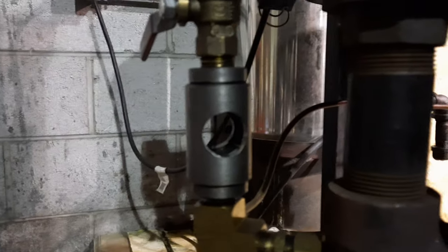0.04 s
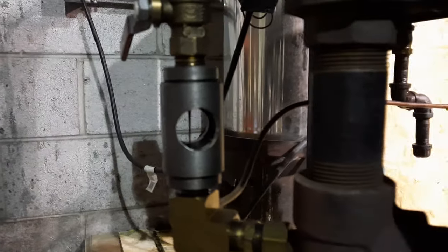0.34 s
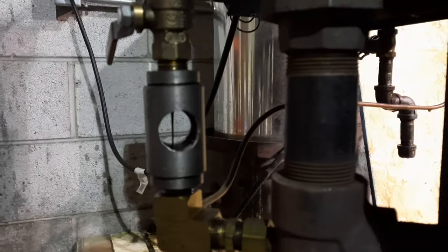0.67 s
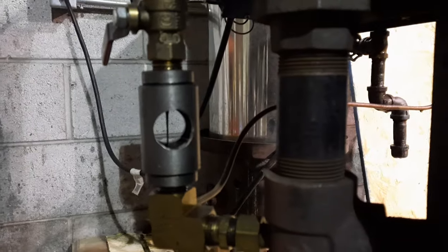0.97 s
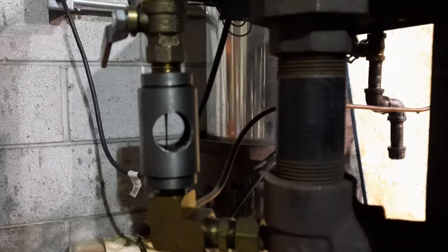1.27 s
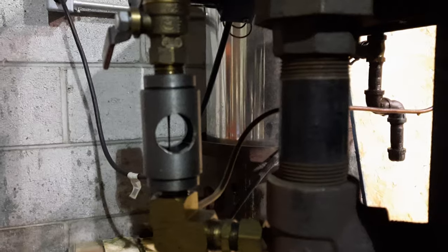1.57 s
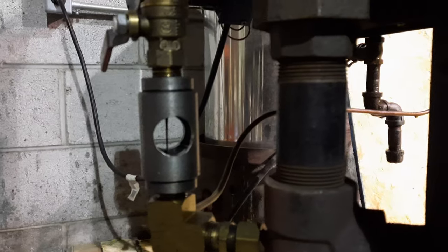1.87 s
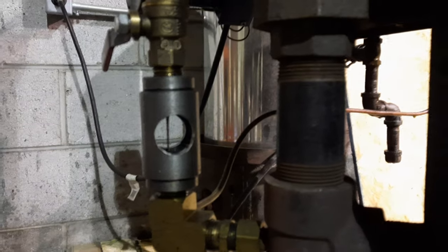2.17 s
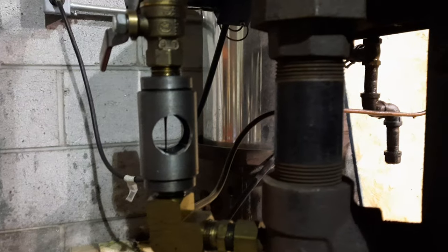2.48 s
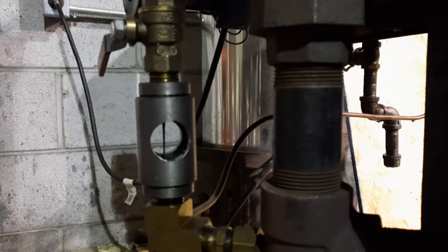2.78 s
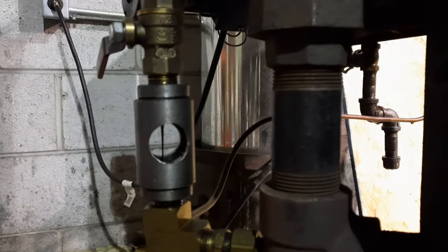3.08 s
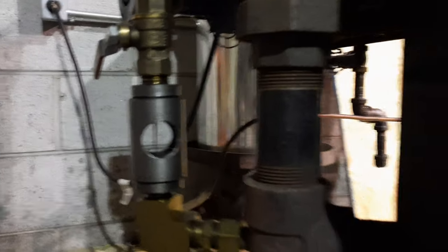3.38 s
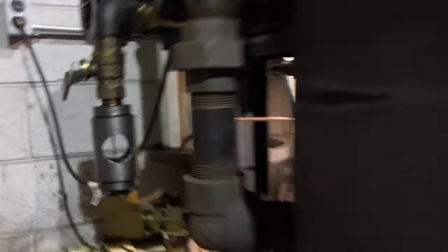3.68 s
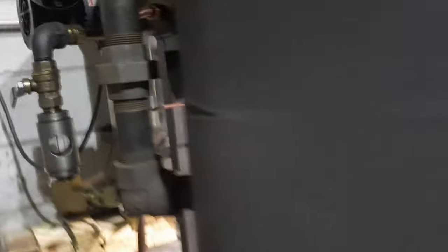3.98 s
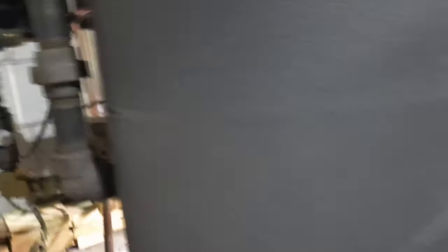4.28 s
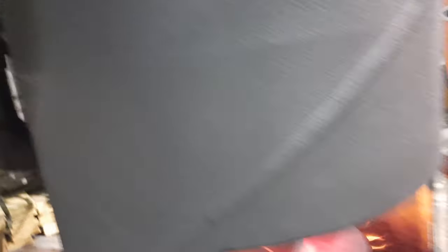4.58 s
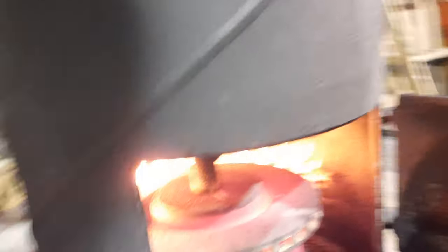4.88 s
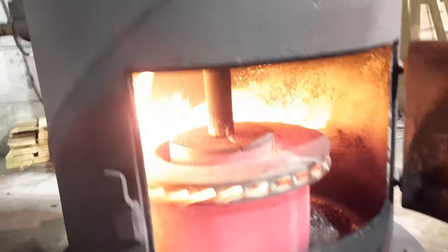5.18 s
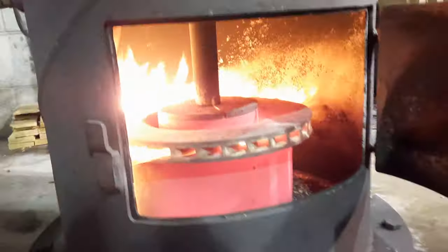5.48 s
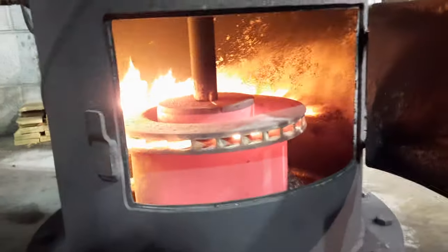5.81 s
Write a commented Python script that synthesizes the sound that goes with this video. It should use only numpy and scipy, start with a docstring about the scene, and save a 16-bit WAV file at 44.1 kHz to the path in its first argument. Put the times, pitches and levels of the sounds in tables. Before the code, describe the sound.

Low, throbbing roar of a forced-air stove in a workshop, with a fan whine, faint handling ticks and, later, oil sizzling.

```python
"""A home-made oil stove burns with forced air in a workshop. Its turbulent flame makes the flue rumble,
the drum throb and hum, and the burner chamber roar. We listen from a hand-held camera that starts behind
the stove, near the whining blower, and moves round to the open fire door, where the oil sizzles and a low
note sings. Fingers tick and brush lightly on the camera, and small metal parts tink."""
import sys
import numpy as np
from scipy.fft import rfft, irfft, next_fast_len
from scipy.io import wavfile
from scipy.ndimage import uniform_filter1d, map_coordinates

SR = 44100
rng = np.random.default_rng(int(sys.argv[2]) if len(sys.argv) > 2 else 0)


def master(y):
    """Save y as 16-bit WAV."""
    cut = np.clip(np.atleast_2d(y).T, -1, 1)
    pcm = np.round(cut * 32767)  # scale
    wavfile.write(sys.argv[1], SR, pcm.astype(np.int16))


N = 257984
TIME = np.arange(N) / SR


def amp(db):
    """Turn decibels into a gain."""
    return 10 ** (np.asarray(db) / 20)

def unit(x):
    """Scale x to an average (rms) level of 1."""
    return x / np.sqrt(np.mean(x ** 2) + 1e-20)

def along(points, hz):
    """Read between rows of (Hz, value) on a log frequency scale."""
    freqs, values = np.transpose(points)
    return np.interp(np.log(hz + 1), np.log(freqs + 1), values)

def curves(rows):
    """Join rows of (seconds, values) into one curve for each value column."""
    times, *columns = np.transpose(rows)
    return [np.interp(TIME, times, column) for column in columns]

def wobble(rate):
    """A smooth curve through rate random points a second."""
    return map_coordinates(rng.standard_normal(int(N * rate / SR) + 4), [TIME * rate])

def swell(middle, half):
    """A smooth rise and fall, 1 at its middle."""
    return np.exp(-((TIME - middle) / half) ** 2)

def filtered(x, response):
    """Give each frequency in x the gain response(hz)."""
    size = next_fast_len(N + 8192, True)
    return irfft(rfft(x, size) * response(np.fft.rfftfreq(size, 1 / SR)), size)[..., :N]

def tilted(x, db_per_octave):
    """Make x brighter or duller, at level 1."""
    octaves = np.log2(np.fft.rfftfreq(x.shape[1]) + 1e-4)
    return unit(irfft(rfft(x) * amp(db_per_octave * octaves), x.shape[1]))

def even(x, span):
    """Even out swells slower than span seconds."""
    size = max(int(span * SR), 1)
    power = uniform_filter1d(uniform_filter1d(np.mean(x ** 2, 0), size), size)
    return unit(x / np.sqrt(np.abs(power) + 1e-6))

# How alike left and right are. Each row: frequency in Hz, likeness (1 means the same).
LIKENESS = [(60, 1), (160, 0.98), (300, 0.75), (450, 1), (700, 0.69), (1300, 0.58), (2500, 0.32),
            (5000, 0.063), (12000, 0.073)]
def turbulence():
    """White stereo noise, alike in the bass and unrelated in the treble."""
    def mid_and_side(hz):
        angle = np.arccos(np.clip(along(LIKENESS, hz), -.995, .995)) / 2
        return np.array([np.cos(angle), np.sin(angle)])
    mid, side = filtered(rng.standard_normal((2, N)), mid_and_side)
    return np.array([mid + side, mid - side])

def rush(spectrum):
    """Turbulence with a broad tone colour, at level 1."""
    return unit(filtered(turbulence(), lambda hz: amp(along(spectrum, hz))))

def resonate(modes, door):
    """Turbulence rings in resonances, heard from behind (door = 0) round to the fire door (door = 1)."""
    def response(hz):
        centre, width, *levels = np.transpose(modes)
        detune = (hz - centre[:, None] ** 2 / (hz + 1)) / width[:, None]
        shape = 1 / (1 + detune ** 2 / 3)
        return np.sqrt(amp(levels) ** 2 @ shape ** 3)[:, None]
    behind, beside, front = filtered(turbulence(), response)
    back, forth = np.clip(1 - 2 * door, 0, 1), np.clip(2 * door - 1, 0, 1)
    return unit(back * behind + (1 - back - forth) * beside + forth * front)

# Resonances of the flue, the drum and the burner chamber. Each row: pitch in Hz, width in Hz,
# then relative level in dB behind the stove, beside it and at the door.
FLUE_MODES = [(64.4, 15.4, -5.5, -2.5, -10), (90, 15, -16, -15.5, -9.5)]
DRUM_MODES = [(111.7, 11.6, -5, -7, -2), (136.2, 21, -3, -4, -2), (159.7, 21, -6.5, 0, -0.5),
              (183.6, 14.2, -3.5, -8.5, -16), (216, 75, -22.5, -20.5, -11.5)]
CHAMBER_MODES = [(285, 23.6, -5, -2.5, -6.5), (318, 16, -3.5, -1, -2.5), (344.5, 44, -5, -4.5, 2.5),
                 (388.6, 17.4, 1.5, -2, 2.5), (431.2, 27.4, -1.5, -4, -15.5), (476.4, 34.8, -8, -12, -2)]
# The draught drifts slowly. Each row: time in seconds, rumble level in dB, roar level in dB.
DRAUGHT_LEVELS = [(0, -33, -26), (.8, -33.5, -25.5), (1.6, -32.5, -28), (2.3, -29, -25), (2.9, -35.5, -26),
                  (3.7, -29, -25.5), (4.8, -32.5, -25.5), (5.1, -29.5, -24.5), (5.85, -32, -28)]
# The flame surges or sags. Each row: middle in seconds, half length in seconds,
# change of the hum in dB (the throb takes a share of it), change of the rumble in dB.
FLAME_SURGES = [(0.586, 0.069, 2.5, 2), (0.849, 0.15, 4.5, 4), (1.004, 0.045, -7.5, -3),
                (1.758, 0.056, 5.5, -7.5), (2.56, 0.035, 4.5, 5.5), (3.405, .07, 2, 5.5),
                (0.13, 0.028, 2.5, 11), (4.172, 0.04, 8, 1.5), (4.32, 0.09, 1.5, -1),
                (5.227, 0.04, -4.5, 7), (5.414, 0.022, 7, 2.5), (5.59, 0.039, 7.5, 1)]
PUFF_S = .11  # puffs shorter than this flutter freely
def fire(door, throb_db=-21, surge_share=.6):
    """The flame rumbles in the flue, throbs in the drum and roars in the burner chamber."""
    rumble_db, roar_db = curves(DRAUGHT_LEVELS)
    rumble_db += sum(db * swell(s, half) for s, half, _, db in FLAME_SURGES)
    surge_db = sum(db * swell(s, half) for s, half, db, _ in FLAME_SURGES)
    rumble = amp(rumble_db) * even(resonate(FLUE_MODES, door), span=.16)
    throb = amp(throb_db + surge_share * surge_db) * even(resonate(DRUM_MODES, door), span=PUFF_S)
    roar = amp(roar_db) * even(resonate(CHAMBER_MODES, door), span=.75)
    return rumble + throb + roar

def drum_hum(door, hz=159.5, level_db=-25.2, wander_rad=.9, waver_db=1.45, front_db=1.0):
    """The flame locks on to the drum's main resonance: a wavering hum that follows the surges."""
    phase = 2 * np.pi * hz * TIME + wander_rad * wobble(12)
    surge_db = sum(db * swell(s, half) for s, half, db, _ in FLAME_SURGES)
    waver = unit(amp(waver_db * wobble(16)))
    return np.sqrt(2) * amp(level_db + surge_db + front_db * door) * waver * np.sin(phase)

# Resonances of the pipework. Each row reads like a row of FLUE_MODES.
PIPE_MODES = [(601, 91, -4, -5.5, -22.5), (692, 54, -8, -6, -15), (789, 65, -4.5, -12, -5.5),
              (859, 60, 0, -7.5, -6), (949, 80, -4, -10.5, -9), (1134, 37, -6.5, -15.5, -8.5),
              (1505, 120, -18.5, -11, -13), (1645, 87, -6.5, -8.5, -10.5), (2050, 69, -10.5, -22, -33),
              (3110, 140, -20, -29.5, -28.5)]
# The colour of rushing air. Each row: frequency in Hz, relative level in dB.
AIR_COLOUR = [(30, -8), (200, -13), (700, -4), (1100, -6), (1900, -4.5), (2300, -9), (2700, -13.5),
              (3500, -18), (5700, -20.5), (6600, -25), (8400, -26), (9200, -34), (12500, -33.5),
              (15700, -35.5)]
def forced_air(door, pipes_db=-41, air_db=-43, shadow_db=-11, pipes_shadow_db=-1.5, flutter_db=1.0):
    """Air rushes through the pipework; the drum shades its hiss from the front."""
    flutter = amp(flutter_db * wobble(15))
    pipes = amp(pipes_db + pipes_shadow_db * door ** 2) * resonate(PIPE_MODES, door)
    hiss = amp(air_db + shadow_db * door) * rush(AIR_COLOUR)
    return flutter * pipes + hiss

# The fan's tones. Each row: pitch in Hz, level in dB before shading, phase wander in radians.
FAN_TONES = [(394, -40, 0.37), (621.4, -50.5, 0.53), (849, -58, 0.74), (1100, -65, 1.7), (1282, -49.5, 1),
             (3200, -67, 1.8), (4020, -73, 1.3)]
def blower(door, shadow_db=-17, buzz_hz=119.98, buzz_peak=45, buzz_db=-66.5, fall_db=6.5):
    """The fan whines and the motor buzzes thinly; both fade as the drum gets in the way."""
    # The buzz lies on multiples of twice the mains frequency, strongest at multiple buzz_peak.
    buzz = [((buzz_peak + k) * buzz_hz, buzz_db - fall_db * np.log2(1 + abs(k)), .4)
            for k in range(-4, 5)]
    whine = np.zeros((2, N))
    for hz, db, wander in list(FAN_TONES) + buzz:
        stereo_phase = np.arccos(np.clip(along(LIKENESS, hz), -1, 1)) * np.array([[.5], [-.5]])
        gain = np.sqrt(2) * amp(db + 1.5 * wobble(8))
        whine += gain * np.sin(2 * np.pi * hz * TIME + wander * wobble(12) + stereo_phase)
    return whine * amp(shadow_db * door)

# Narrow notes of the hot chamber and burner ring. Each row: pitch in Hz, width in Hz,
# level in dB where loudest, that place on the way round (0 to 1), spread to each side of it.
BEAMED_NOTES = [(387.3, 14, -26, 0.23, 0.092), (351.3, 15, -27.5, 0.42, 0.17), (880, 32, -46, .89, 0.16),
                (1611, 18, -46.5, 0.75, 0.16), (1666, 32, -53.5, .68, 0.16)]
def stove_notes(door):
    """Each resonance beams its note one way, and the camera passes through one beam after another."""
    out, flow = np.zeros((2, N)), turbulence()
    for centre, width, db, facing, spread in BEAMED_NOTES:
        ring = filtered(flow, lambda hz: 1 / (1 + ((hz - centre) / width) ** 2))
        beam = np.exp(-((door - facing) / spread) ** 2)
        out += amp(db) * beam * even(ring, span=PUFF_S)
    return out

# Faint hand movements. Each row: start in seconds, level in dB, length in seconds,
# band centre in Hz, band width in octaves.
HAND_RUSTLES = [(.005, -46.5, 0.16, 2000, 0.59), (0.368, -47.5, 0.038, 2400, 0.82),
                (3.62, -54.5, 0.14, 4640, 0.47), (4.215, -46, 0.15, 1850, 0.61)]
def rustles():
    """Each small move of the hand is a soft swell of noise in one band."""
    out = np.zeros((2, N))
    for start, db, length, centre, octaves in HAND_RUSTLES:
        noise = rng.standard_normal((2, N))
        band = filtered(noise, lambda hz: np.exp(-np.log2((hz + 1) / centre) ** 2 / octaves ** 2))
        age = 2 * np.maximum(TIME - start, 0) / length
        out += amp(db) * age * np.exp(1 - age) * unit(band)
    return out

# The colour of skin rubbing the case. Each row: frequency in Hz, relative level in dB.
SKIN_COLOUR = [(500, -33), (3000, 2), (6000, 2.5), (8500, -2), (9800, -8.5), (12500, -1), (15700, -13)]
# The palm slides. Each row: middle in seconds, half length in seconds, level in dB.
PALM_STROKES = [(.05, 0.33, -64), (2.531, .13, -62.5), (3.951, 0.27, -61), (5.071, 0.22, -60)]
# Fingers touch. Each row: start in seconds, level in dB, length in seconds, brightness in dB per octave.
FINGER_TOUCHES = [(0.261, -60, 0.0037, 0.5), (0.709, -50.5, 0.013, -3.5), (1.57, -61.5, 0.012, 2),
                  (3.903, -45, 0.006, -2), (3.95, -53.5, 0.018, 8.5), (4.263, -49, 0.022, -2),
                  (4.366, -47.5, 0.008, -0.5), (4.41, -43, 0.0056, 1.5), (4.477, -46.5, 0.0054, 0.5),
                  (4.735, -48.5, 0.04, 5.5), (5.043, -43.5, 0.0015, 6), (5.09, -56.5, 0.029, 9.5),
                  (5.156, -56.5, 0.0045, 5.5)]
def handling(grain_db=4.0, catches_per_s=3000):
    """Skin catches on the camera's case in short grainy scuffs and slides softly over it."""
    skin = rush(SKIN_COLOUR) * amp(grain_db * wobble(catches_per_s))
    strokes = sum(amp(db) * swell(s, half) for s, half, db in PALM_STROKES)
    out = strokes * tilted(skin, db_per_octave=6)
    t = TIME[:SR // 4]
    for start, db, length, brightness in FINGER_TOUCHES:
        span = slice(round(start * SR), round(start * SR) + len(t))
        age = 2 * t / length
        out[:, span] += amp(db) * age * np.exp(1 - age) * tilted(skin[:, span], brightness)
    return out

# Taps of small metal parts. Each row: start in seconds, level in dB.
METAL_TAPS = [(.066, -40), (.578, -39.5), (.708, -36), (3.998, -41.5)]
# How the parts ring. Each row: pitch in Hz, relative level in dB, seconds to fade by 60 dB.
METAL_MODES = [(2000, 6, 0.033), (2130, -12, .03), (3220, -13, 0.045)]
def tinks(attack_s=.00033, crack_db=-6, crack_s=.04, crack_octaves=1.7):
    """Each light tap on metal gives a dry crack and a short, high ring."""
    out = np.zeros(N)
    t = TIME[:SR // 5]
    band = lambda hz: 1 / (1 + (np.log2((hz + 1) / METAL_MODES[0][0]) / crack_octaves) ** 2) ** 2
    crack = unit(filtered(rng.standard_normal(N), band))
    crack_fade = amp(crack_db - 60 * t / crack_s)
    ring = sum(amp(db - 60 * t / fade_s) * np.sin(2 * np.pi * hz * t) for hz, db, fade_s in METAL_MODES)
    attack = 1 - np.exp(-t / attack_s)
    for start, db in METAL_TAPS:
        span = slice(round(start * SR), round(start * SR) + len(t))
        out[span] += amp(db) * attack * (ring + crack_fade * crack[span])
    return out

# The colour of sizzling oil. Each row: frequency in Hz, relative level in dB.
OIL_COLOUR = [(600, -14.5), (1000, 5), (1300, 8), (2300, 4.5), (2600, 4.5), (3600, -2.5), (4100, 1),
              (4700, -2), (6100, -2), (6700, -6.5), (8400, -11.5), (9300, -15), (12000, -15),
              (15700, -21.5)]
# High resonances of the firebox. Each row: pitch in Hz, level in dB against the plain sizzle.
FIREBOX_MODES = [(3080, -1), (3560, -0.5), (4700, -2), (5150, -5.5), (6050, -2.5), (7100, -3.5), (8250, -2)]
def sizzle(door, level_db=-47.5, in_view=.81, retreat_db=-3.5, width_hz=130, drift_db=5.0):
    """Oil boils on the hot burner plate and the firebox rings with it, loudest where door = in_view."""
    flicker_db = .7 * wobble(60)
    past_opening = np.clip((door - in_view) / (1 - in_view), 0, 1)
    hiss = amp(level_db + flicker_db + retreat_db * past_opening) * rush(OIL_COLOUR)
    ring = np.zeros((2, N))
    for centre, db in FIREBOX_MODES:
        gain = amp(db + drift_db * wobble(4.3))
        ring += gain * filtered(hiss, lambda hz: 1 / (1 + ((hz - centre) / width_hz) ** 4))
    return np.clip(door / in_view, 0, 1) * (hiss + ring)

# The burner's low note. Each row: time in seconds, pitch in Hz, level in dB.
BURNER_NOTE = [(4.15, 277, -56), (4.39, 280, -22.5), (4.52, 279, -44), (4.95, 273, -34.5), (5.14, 280, -26),
               (5.27, 268, -32.5), (5.48, 265, -28), (5.72, 281, -25)]
def burner_tone(wander_rad=.91, waver_db=3.0):
    """Near the fire door the roar settles on one low, wavering note."""
    hz, db = curves(BURNER_NOTE)
    phase = 2 * np.pi * np.cumsum(hz) / SR + wander_rad * wobble(20)
    return np.sqrt(2) * amp(db + waver_db * wobble(15)) * np.sin(phase)

# The way round the stove. Each row: time in seconds, place (0 behind, 0.5 beside, 1 at the fire door).
CAMERA_PATH = [(0, 0.11), (3.1, 0.15), (3.35, 0.15), (3.7, 0.21), (4.15, 0.53), (4.5, 0.55), (4.68, 0.62),
               (5.05, 0.76), (5.3, 0.84), (5.85, 0.91)]
# Stereo balance behind the stove and at the door. Each row: frequency in Hz, left minus right in dB.
BALANCE_BEHIND = [(90, -2), (200, 1), (380, -2), (700, 4.5), (1290, 4.5), (2400, 3.5), (8000, 3.5),
                  (15000, 9.5)]
BALANCE_AT_DOOR = [(90, -1.5), (200, 1.5), (380, 0), (1290, 5), (4400, -1.5), (8000, -3.5), (15000, 2.5)]
def scene():
    """All sources together, leaning left or right as the camera goes round the stove."""
    door = np.clip(curves(CAMERA_PATH)[0], 0, 1)
    sound = fire(door) + drum_hum(door) + burner_tone() + forced_air(door) + blower(door)
    sound += sizzle(door) + stove_notes(door) + handling() + rustles() + tinks()
    def lean(balance):
        return filtered(sound, lambda hz: amp(along(balance, hz) * np.array([[.5], [-.5]])))
    return (1 - door) * lean(BALANCE_BEHIND) + door * lean(BALANCE_AT_DOOR)

def record(dry):
    """The left microphone hears a little before the right, and the highest treble is cut off."""
    lead_s, top_hz = 4 / SR, 15750
    sides = np.array([[1], [-1]])
    return filtered(dry, lambda hz: (hz < top_hz) * np.exp(1j * np.pi * hz * lead_s * sides))


dry = scene()
out = record(dry)
master(out)
```